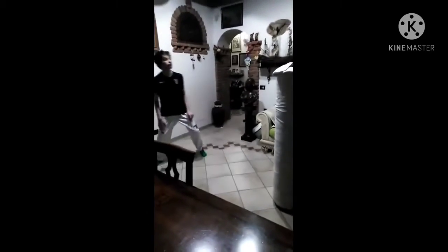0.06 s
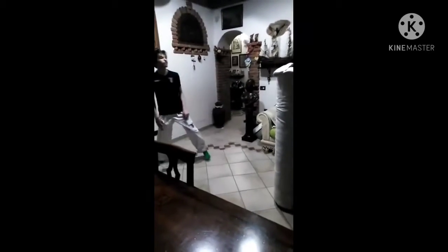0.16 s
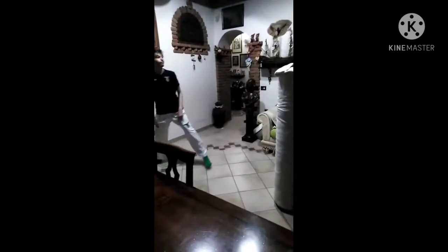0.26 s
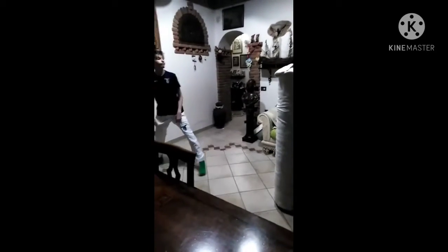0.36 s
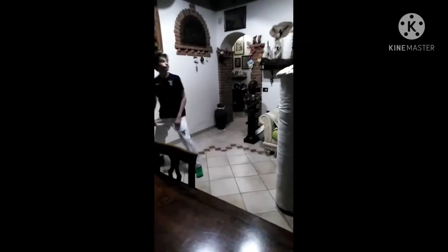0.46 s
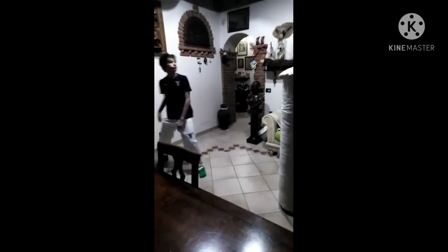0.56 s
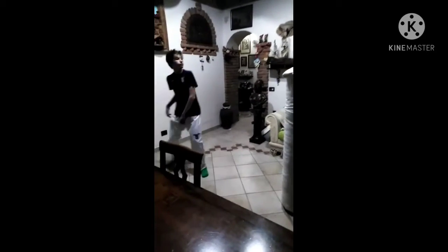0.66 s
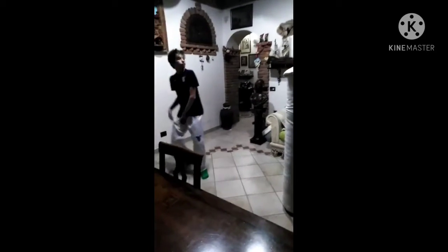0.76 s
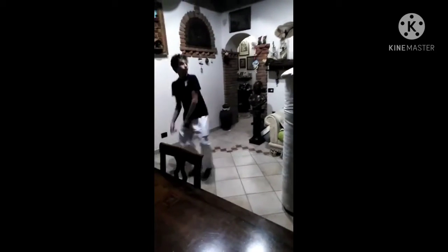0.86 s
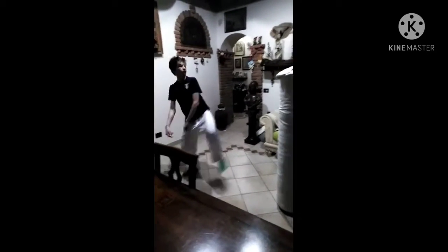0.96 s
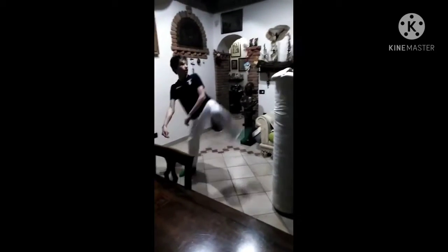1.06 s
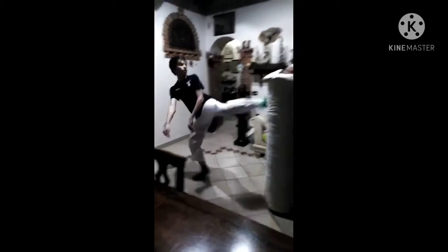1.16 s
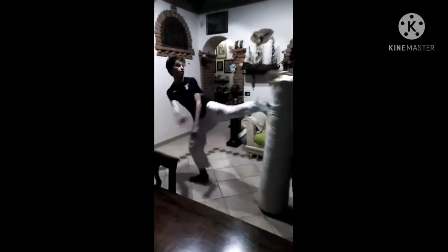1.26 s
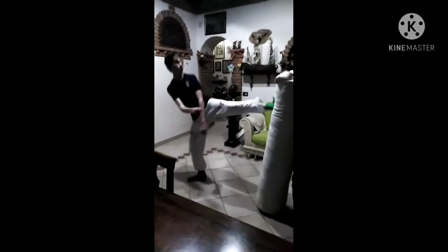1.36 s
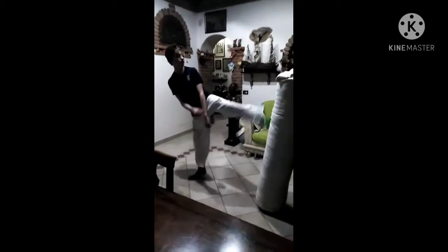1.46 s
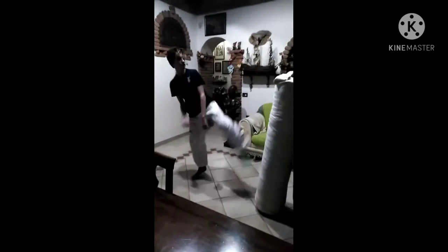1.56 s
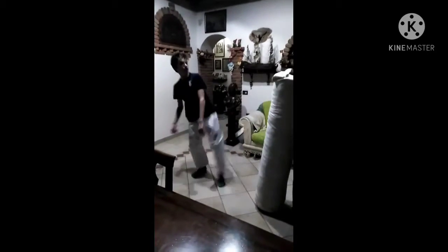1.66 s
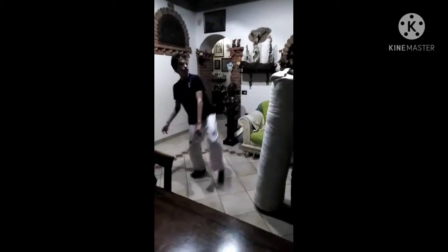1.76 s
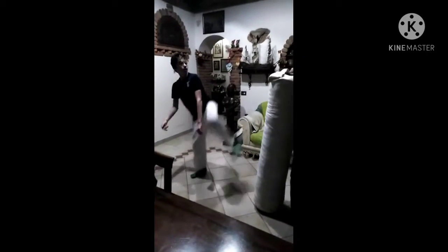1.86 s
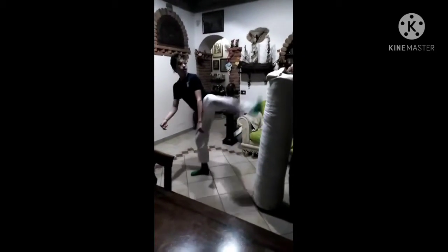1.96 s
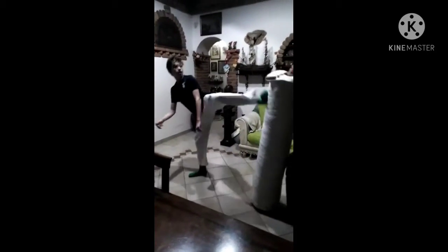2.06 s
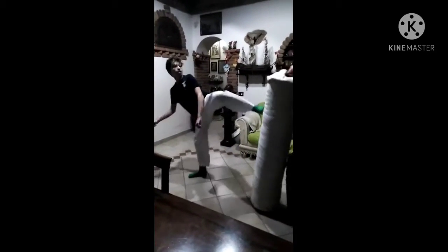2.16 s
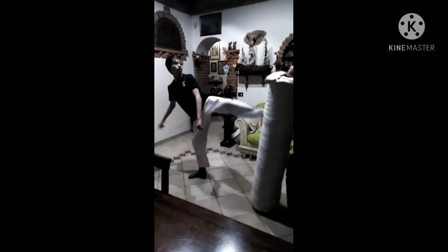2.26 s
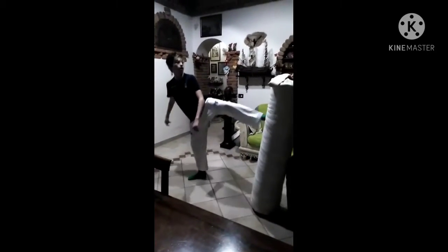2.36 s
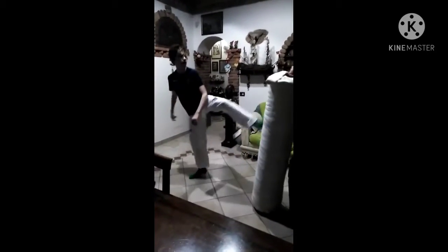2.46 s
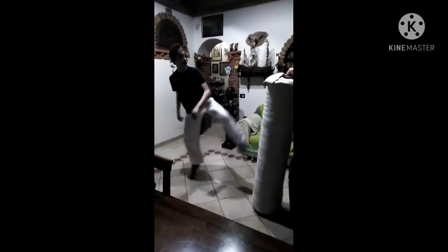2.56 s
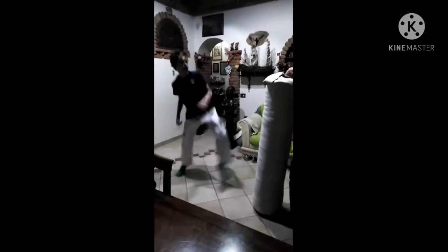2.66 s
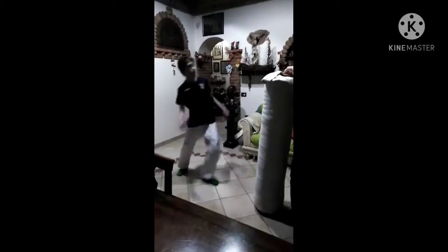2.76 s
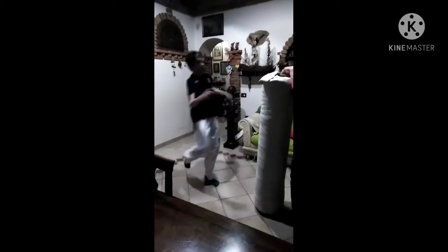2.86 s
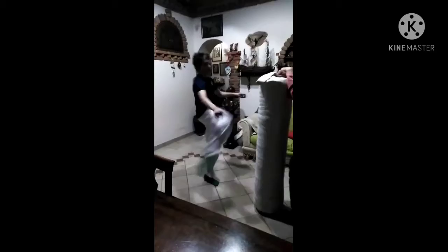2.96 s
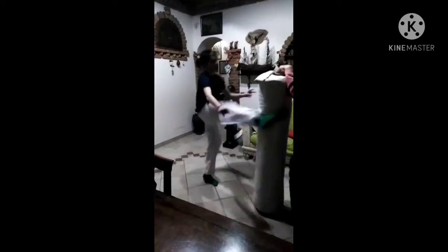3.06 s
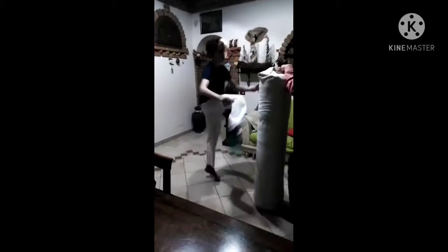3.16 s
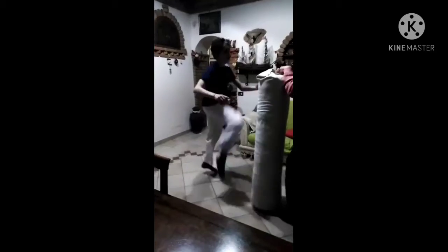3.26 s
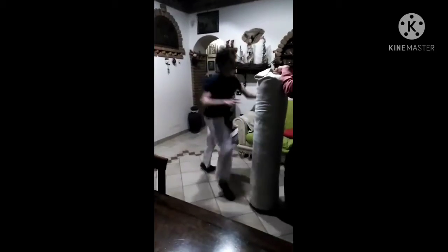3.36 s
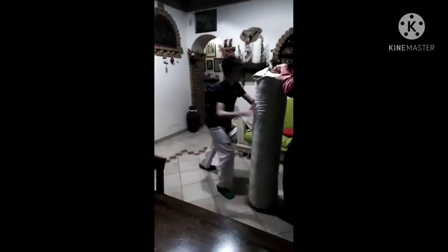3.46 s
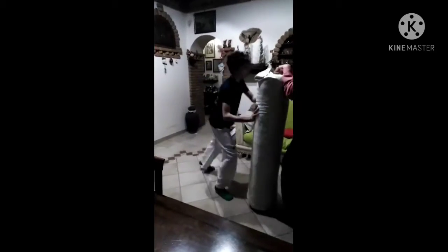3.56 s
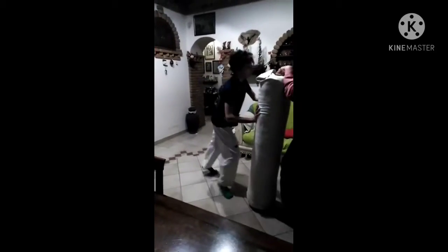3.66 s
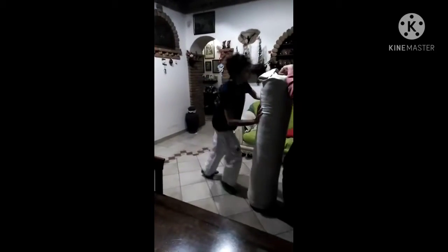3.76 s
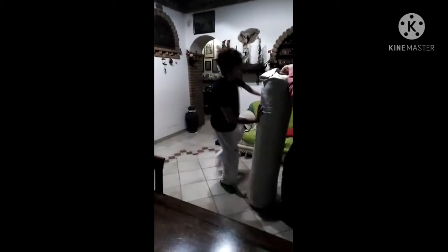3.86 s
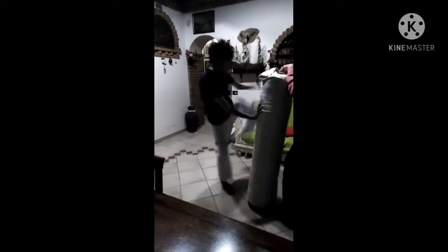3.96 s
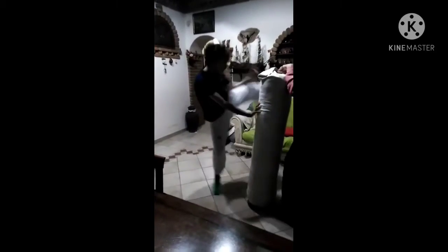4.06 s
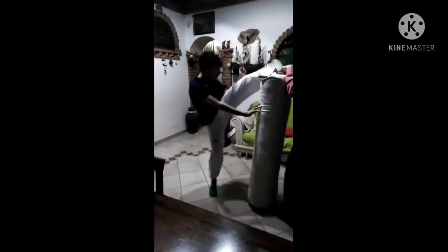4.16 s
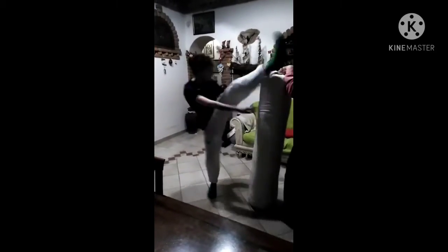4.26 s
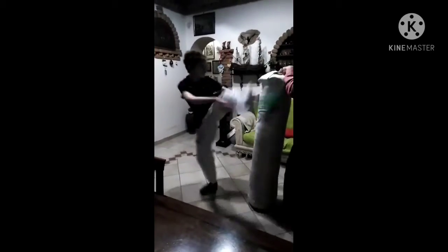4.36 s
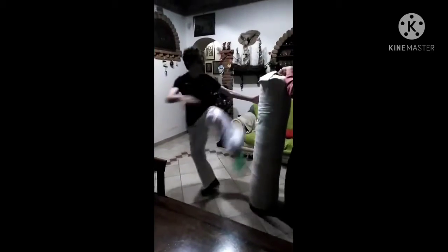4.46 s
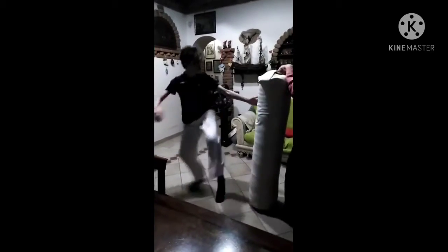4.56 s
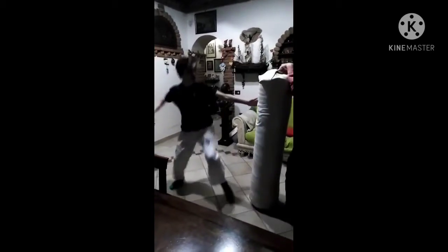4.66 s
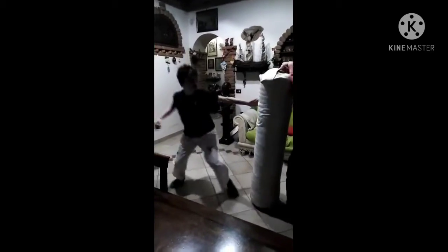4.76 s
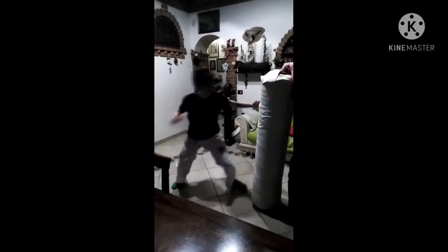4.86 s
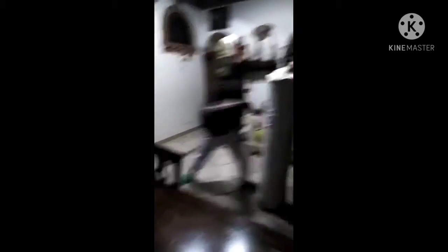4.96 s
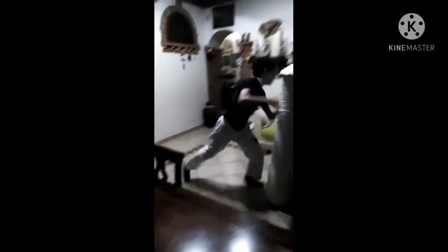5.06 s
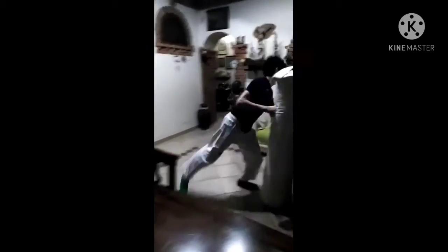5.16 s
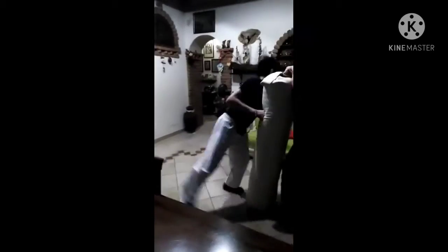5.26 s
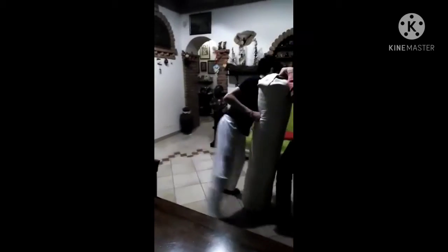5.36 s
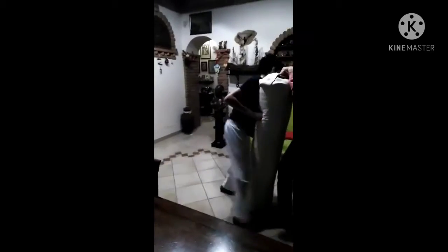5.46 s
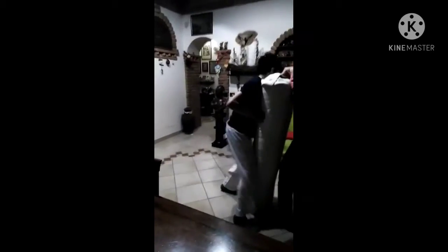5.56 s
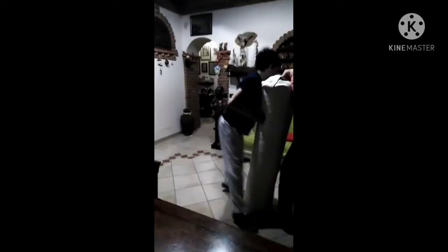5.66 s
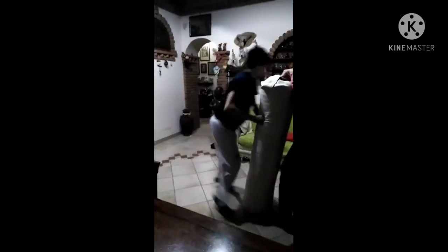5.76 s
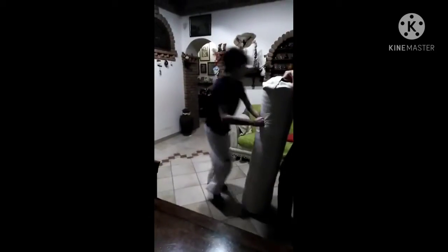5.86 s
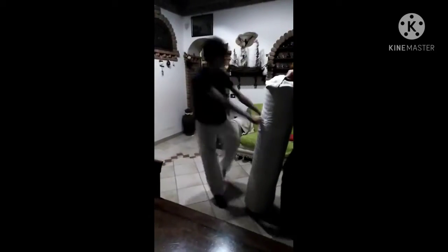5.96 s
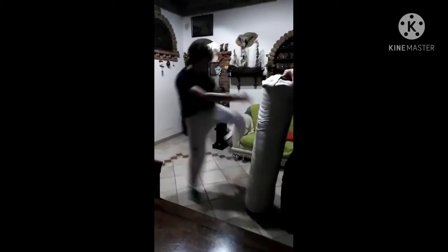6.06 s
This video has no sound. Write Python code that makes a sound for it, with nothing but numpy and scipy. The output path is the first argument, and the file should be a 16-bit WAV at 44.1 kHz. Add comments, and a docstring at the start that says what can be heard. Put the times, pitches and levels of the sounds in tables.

```python
"""A heavy standing bag is kicked and punched in a tiled living room, a few metres from a phone.
Each blow is a filtered thud, a decaying sine dent and two noise bursts: slapped cover, snapped trouser cloth.
Feet thump and slide on the tiles and clothes rustle: filtered pushes and grainy friction noise.
Echoes and banded noise tails make a room that rings for about half a second over a faint hush."""
import sys
import numpy as np
from scipy import signal
from scipy.fft import rfft, irfft, next_fast_len
from scipy.io import wavfile

SR = 44100
rng = np.random.default_rng(int(sys.argv[2]) if len(sys.argv) > 2 else 0)


def dump(signal):
    """Clip the signal to [-1, 1] and save it as 16-bit WAV at the path in sys.argv[1]."""
    limited = np.clip(np.atleast_2d(signal).T, -1, 1)
    pcm = np.round(limited * 32767).astype(np.int16)
    wavfile.write(sys.argv[1], SR, pcm)


N = 269446
RING_SAMPLES = 28000


def undb(db):
    """Decibels to gain."""
    return 10 ** (np.asarray(db) / 20)


def unit(x):
    """Scale to unit energy."""
    return x / np.sqrt(np.sum(x ** 2, axis=-1, keepdims=True) + 1e-30)


def on_log(hz, points_hz, values):
    """Join values by straight lines on a log-frequency axis."""
    return np.interp(np.log(np.maximum(hz, 1)), np.log(points_hz), values)


def response(spectrum):
    """Causal minimum-phase impulse response with the given (Hz, dB) colour, by folding the cepstrum."""
    size = 4096
    hz = np.linspace(0, SR / 2, size // 2 + 1)
    gain = undb(on_log(hz, *np.transpose(spectrum)))
    cepstrum = irfft(np.log(gain))
    cepstrum[1:size // 2] *= 2
    cepstrum[size // 2 + 1:] = 0
    return irfft(np.exp(rfft(cepstrum)))


def colour(x, spectrum):
    """Filter a signal by a spectrum."""
    return signal.fftconvolve(x, response(spectrum))[:len(x)]


def resonate(x, hz, width_hz):
    """One resonance."""
    return signal.lfilter(*signal.iirpeak(hz, hz / width_hz, fs=SR), x)


def grains(count, spread_db, grain_samples=24):
    """Friction noise: tiny slips of uneven strength, rms 1."""
    slip_db = spread_db * rng.standard_normal(count // grain_samples + 1)
    strength = np.repeat(undb(slip_db), grain_samples)[:count]
    return unit(rng.standard_normal(count) * strength) * np.sqrt(count)


def add(out, s, sound):
    """Mix a stereo sound in at time s."""
    start = max(int(s * SR), 0)
    out[:, start:start + sound.shape[1]] += sound[:, :N - start]


def burst(x, db):
    """Give a short sound the energy of 50 ms at this level."""
    return unit(x) * undb(db) * np.sqrt(SR / 20)


def push(spectrum, sharp_hz):
    """One push into a heavy body; a softer contact takes away the treble."""
    low_pass = signal.butter(2, sharp_hz, fs=SR, output="sos")
    return signal.sosfilt(low_pass, np.pad(response(spectrum), (0, SR // 4)))


# room bands: (centre [Hz], t60 [s], left-right likeness [0-1])
ROOM_BANDS = [(59.5, .52, 0.96), (149, 0.42, 0.96), (300, .53, 0.9), (597, 0.52, 0.4), (1200, 0.47, 0.01),
              (2500, 0.48, 0), (4980, 0.46, 0), (12000, .4, 0.07)]


def spread(mid, side):
    """Two unrelated signals become a diffuse field: alike in the bass, unrelated in the treble."""
    size = next_fast_len(len(mid), True)
    hz, _, likeness = np.transpose(ROOM_BANDS)
    c = on_log(np.fft.rfftfreq(size, 1 / SR), hz, likeness)
    m = rfft(mid, size) * np.sqrt((1 + c) / 2)
    s = rfft(side, size) * np.sqrt((1 - c) / 2)
    return irfft(np.array([m + s, m - s]), size)[:, :len(mid)]


def diffuse_field():
    """Two seconds of steady room noise, split into the room's bands: (band, channel, sample)."""
    size = 2 * SR
    noise = rfft(spread(*rng.standard_normal((2, size))))
    freqs_hz, centres_hz = np.fft.rfftfreq(size, 1 / SR), np.transpose(ROOM_BANDS)[0]
    return np.array([irfft(noise * on_log(freqs_hz, centres_hz, pick)) for pick in np.eye(len(ROOM_BANDS))])


FIELD = diffuse_field()


def tail(source_s=0.0082):
    """Diffuse reverberation of a source fading in source_s; random field slice, each band at its own t60."""
    t60_s = np.transpose(ROOM_BANDS)[1][:, None]
    decay = np.exp(-2 * np.log(1000) / t60_s * np.arange(RING_SAMPLES) / SR)
    power = signal.lfilter([1], [1, -np.exp(-2 / (source_s * SR))], decay)
    start = rng.integers(FIELD.shape[2] - RING_SAMPLES)
    envelope = unit(np.sqrt(power))
    return np.einsum("bcn,bn->cn", FIELD[:, :, start:start + RING_SAMPLES], envelope)


# early echoes off the tiles and walls: (delay [s], left gain [linear], right gain [linear])
ECHOES = [(.0022, 0.32, 0.22), (.0058, 0.1, 0.33), (.0085, .35, .3)]


def early():
    """The straight path, two samples later on the left, and the first echoes."""
    path = np.zeros((2, RING_SAMPLES))
    path[0, 2] = path[1, 0] = 1
    for delay_s, left, right in ECHOES:
        path[:, int(delay_s * SR)] += [left, right]
    return path


# standing waves of the room and the bag: (frequency [Hz], relative level [dB], t60 [s])
RINGING_MODES = [(97, -14, 0.19), (149.25, -6.5, 0.63), (340.3, -1, .45), (527, -8, 0.27),
                 (647.7, -6.5, 0.48), (661, -9, 0.59), (926, -5.5, 0.55), (1139, -4.5, 0.7),
                 (1323, -3, 0.28), (1505, -9.5, .28), (1606, -9, 1), (1680, -8, .3), (2230, -1.5, .35)]


def standing_waves(half_cycle_hz=1500):
    """Lightly damped modes left ringing; short waves reach the two microphones out of step."""
    t, out = np.arange(RING_SAMPLES) / SR, 0
    for hz, db, t60_s in RINGING_MODES:
        # channels differ by at most half a cycle at half_cycle_hz
        lead_rad = np.array([[1], [-1]]) * rng.uniform(-1, 1) * np.pi * hz / half_cycle_hz / 2
        mode = np.sin(2 * np.pi * hz * t + lead_rad) * np.exp(-np.log(1000) * t / t60_s)
        out = out + undb(db) * unit(mode)
    return out


def room(x, direct_db, ring=0):
    """A compact source heard directly and through the room."""
    return signal.fftconvolve(x[None], undb(direct_db) * early() + tail() + ring, axes=1)


def crackle(spectrum, db, decay_s, direct_db, ring=0):
    """Noisy burst from a broad surface: directions get different grains, so the reverberation is smooth."""
    t = np.arange(RING_SAMPLES) / SR
    slips = unit(grains(RING_SAMPLES, spread_db=7) * np.exp(-t / decay_s))
    direct = signal.fftconvolve(slips[None], early(), axes=1)[:, :RING_SAMPLES]
    heard = undb(direct_db) * direct + tail(decay_s) + ring
    return signal.fftconvolve(heard, burst(response(spectrum), db)[None], axes=1)


def friction(spectrum, grain_db):
    """Steady noise spread by the room, grainier as grain_db leaves 0; rms 1."""
    left_right = spread(*(colour(grains(N, grain_db), spectrum) for _ in range(2)))
    return unit(left_right) * np.sqrt(N)


# quiet-room spectrum: (frequency [Hz], relative density [dB])
HUSH = [(25, -20), (70, 0.5), (150, -6), (300, -8.5), (600, -21), (2000, -18), (14000, -28)]
HUSH_DB = -69.5


def hush():
    """Steady diffuse noise of a very quiet room."""
    return undb(HUSH_DB) * friction(HUSH, grain_db=3.5)


def strokes(rate_hz=45, depth_db=0.7):
    """Uneven gain of short rubbing strokes."""
    knots = rng.standard_normal(1024)
    return undb(depth_db * np.interp(np.arange(N) / SR * rate_hz, np.arange(len(knots)), knots))


def swell(s, length_s, attack_s, release_s):
    """Envelope of one move: smooth attack, hold, release."""
    age_s = np.arange(N) / SR - s
    rise = np.clip(age_s / attack_s, 0, 1)
    return rise * np.sqrt(rise) * np.exp(-np.maximum(age_s - length_s, 0) / release_s)


# steps, pivots, leg swings: (time [s], length [s], sole friction [dB], cloth rustle [dB])
MOVES = [(-.02, 0.018, -63, -60.5), (0.277, 0.11, -57.5, -67.5), (0.754, .06, -80, -71),
         (0.989, 0.16, -55, -65), (1.356, .2, -48, -52.5), (1.707, 0.047, -45.5, -66),
         (1.756, 0.066, -40, -73), (1.913, 0.2, -59, -68), (2.26, 0.066, -57, -66),
         (2.378, 0.081, -60, -68), (2.782, 0.12, -55, -88), (2.827, 0.099, -41.5, -63.5),
         (2.977, 0.34, -50.5, -74), (3.424, 0.1, -56, -64.5), (3.508, 0.057, -48, -64),
         (3.854, 0.061, -54, -80.5), (3.902, 0.36, -55, -55.5), (4.225, 0.11, -46, -57),
         (4.382, 0.057, -43, -59.5), (4.571, 0.086, -66, -63.5), (4.633, 0.074, -50.5, -49),
         (4.943, 0.13, -53.5, -55.5), (5.249, 0.13, -83, -65), (5.532, 0.025, -53.5, -61),
         (5.592, 0.053, -63.5, -62), (5.906, 0.099, -54, -76), (5.97, 0.11, -47, -55)]
# friction spectra of sole and cloth: (frequency [Hz], relative density [dB])
SOLE = [(30, -11.5), (70, 1.5), (160, 3.5), (330, 7), (550, 0.5), (1000, -0.5), (1900, -6.5), (3500, -15),
        (7000, -26), (15000, -45.5)]
CLOTH = [(100, -24.5), (700, -13), (2000, 4), (3500, 1), (5500, 1.5), (8000, -1.5), (12000, -4.5),
         (15000, -14)]
SOLE_ATTACK_S, SOLE_RELEASE_S = 0.03, 0.06
CLOTH_LAG_S, CLOTH_ATTACK_S, CLOTH_RELEASE_S = 0.0095, 0.019, 0.042


def movement():
    """Soles shuffle and clothes rustle as friction noise; the loose cloth trails the foot."""
    sole = cloth = 0
    for s, length_s, sole_db, cloth_db in MOVES:
        sole_swell = swell(s, length_s, SOLE_ATTACK_S, SOLE_RELEASE_S)
        cloth_swell = swell(s + CLOTH_LAG_S, length_s, CLOTH_ATTACK_S, CLOTH_RELEASE_S)
        sole = np.hypot(sole, undb(sole_db) * sole_swell)
        cloth = np.hypot(cloth, undb(cloth_db) * cloth_swell)
    shuffle = sole * strokes() * friction(SOLE, grain_db=2)
    rustle = cloth * strokes() * friction(CLOTH, grain_db=2.5)
    return shuffle + rustle


# weight shift onto a foot; level relative to the sole friction
SHIFT_DELAY_S, SHIFT_DB, SHIFT_HZ = 0.018, -3.5, 280
# light footwork before the first kick
PATTER_FROM_S, PATTER_UNTIL_S, PATTER_PER_S, PATTER_DB, PATTER_HZ = 0.27, 0.92, 8.7, -65, 221


def light_steps(scatter_db=2):
    """A soft tread under every move, and uneven patter on the way to the bag: (s, dB, sharpness Hz)."""
    steps = [(s + SHIFT_DELAY_S, sole_db + SHIFT_DB, SHIFT_HZ) for s, _, sole_db, _ in MOVES]
    for s in np.arange(PATTER_FROM_S, PATTER_UNTIL_S, 1 / PATTER_PER_S):
        late, weight = rng.uniform(-1, 1, 2)
        late_s = abs(late) / PATTER_PER_S / 2
        steps.append((s + late_s, PATTER_DB + scatter_db * weight, PATTER_HZ))
    return steps


# footfalls, faint to heavy: (time [s], level [dB], contact sharpness [Hz])
THUMPS = [(0.095, -66, 240), (.212, -61, 350), (0.255, -54, 201), (.344, -54, 300), (0.498, -53.5, 98),
          (.605, -49, 120), (.652, -56, 116), (1.518, -48, 404), (1.728, -44.5, 220), (2.025, -58, 700),
          (2.423, -60.5, 456), (2.745, -48.5, 147), (2.786, -48, 600), (2.803, -37, 180),
          (2.852, -34.5, 147), (2.891, -42.5, 170), (3.03, -51, 496.5), (3.369, -44, 310),
          (3.455, -42.5, 255.3), (3.888, -52.5, 405), (4.182, -47.5, 170), (4.246, -38, 156),
          (4.302, -47, 149), (4.399, -40.5, 384), (5.882, -51.5, 202), (5.916, -42.5, 175.3)]
# bag rocking back on its base after a blow: (time [s], level [dB], contact sharpness [Hz])
ROCKS = [(1.315, -37, 148), (1.343, -42, 138), (2.088, -37.5, 351), (3.135, -33.5, 614),
         (3.151, -35.5, 129.2), (5.0726, -31, 750)]
# floor spectrum: (frequency [Hz], relative density [dB])
FLOOR = [(25, -23.5), (55, -3.5), (95, 1), (160, -2), (260, -6.5), (500, -9), (1500, -8), (15000, -49)]


def thumps():
    """Dull pushes on the floor, from feet and the rocking base, heard mostly through the room."""
    out, ring = np.zeros((2, N)), undb(-26) * standing_waves()
    for s, db, sharp_hz in THUMPS + ROCKS + light_steps():
        add(out, s, room(burst(push(FLOOR, sharp_hz), db), direct_db=-11.5, ring=ring))
    return out


# trouser legs flicking taut: (time [s], level [dB], decay [s])
FLICKS = [(.214, -67, 0.0034), (1.005, -61.5, .006), (2.027, -82, .005), (3.031, -70, .004),
          (4.973, -58.5, .015), (5.0712, -38, 0.001), (5.413, -72, .003), (5.555, -65.5, .006),
          (5.97, -71.5, .008)]


def flicks():
    """Loose cloth pulled taut as a leg starts or stops: short noise bursts."""
    out = np.zeros((2, N))
    for s, db, decay_s in FLICKS:
        add(out, s, crackle(CLOTH, db, decay_s, direct_db=-5))
    return out


# sliding soles and trouser legs: (time [s], length [s], level [dB], pitch [Hz], width per resonance [Hz])
SKIDS = [(0.233, 0.13, -58, 5400, 3200), (0.667, 0.028, -74, 2560, 1800), (0.762, 0.065, -69, 2800, 2620),
         (4.627, 0.1, -50, 2460, 2600), (4.91, 0.12, -58.5, 1510, 220), (5.868, 0.25, -55, 1557, 170)]


def skids():
    """Sliding cloth hisses; a faint rub or scuff sits in a narrow band: grains through two equal resonances."""
    out = np.zeros((2, N))
    for s, length_s, db, hz, width_hz in SKIDS:
        count = int(length_s * SR)
        slip = grains(count, spread_db=3.5) * signal.windows.tukey(count, 0.55)
        rub = resonate(resonate(slip, hz, width_hz), hz, width_hz)
        add(out, s, room(burst(rub, db), direct_db=-0.5))
    return out


# blows on the bag: (time [s], thud [dB], contact sharpness [Hz], dent [dB], dent pitch [Hz],
#   slap [dB], slap decay [s], cloth [dB], cloth delay [s], cloth decay [s])
BLOWS = [(1.214, -38, 800, -38.5, 358, -42, 0.062, -38.5, 0.0081, 0.066),
         (2.055, -38, 511, -35.5, 240, -39.5, 0.057, -42, .008, 0.072),
         (3.116, -22.5, 1400, -30.5, 321.7, -27.5, 0.004, -33, .0055, 0.0096),
         (5.0555, -22.5, 640, -31.5, 550, -31, 0.0015, -32.5, .002, .006)]
# spectra of filling, slapped cover, snapping cloth: (frequency [Hz], relative density [dB])
BAG = [(25, -36.5), (50, -10), (85, 0.5), (150, 3), (250, -1.5), (400, -8), (600, -7), (1000, -9.5),
       (3000, -18.5), (15000, -37.5)]
COVER = [(100, -18.5), (600, -5.5), (1000, -4.5), (1300, -6), (1600, -7), (1900, -3), (2400, -9),
         (3500, -13), (6000, -19), (15000, -25.5)]
SNAP = [(100, -15.5), (700, 5), (2000, -0.5), (4000, -2.5), (6500, -5.5), (10000, -5.5), (15000, -11)]
CONTACT_DB = -3.5  # direct sound of cover and cloth, relative to their reverberation


def blows(dent_cycles=1.3):
    """The filling thuds, the dent springs back, the cover slaps, then the cloth snaps and crumples."""
    out, ring, t = np.zeros((2, N)), standing_waves(), np.arange(SR // 20) / SR
    for (s, thud_db, sharp_hz, dent_db, dent_hz,
         slap_db, slap_s, cloth_db, cloth_delay_s, cloth_s) in BLOWS:
        thud = burst(push(BAG, sharp_hz), thud_db)
        add(out, s, room(thud, direct_db=-14.5, ring=undb(-24.5) * ring))
        dent = np.sin(2 * np.pi * dent_hz * t) * np.exp(-t * dent_hz / dent_cycles)
        add(out, s, room(burst(dent, dent_db), direct_db=-12.0))
        add(out, s, crackle(COVER, slap_db, slap_s, direct_db=CONTACT_DB, ring=undb(-21.5) * ring))
        add(out, s + cloth_delay_s, crackle(SNAP, cloth_db, cloth_s, direct_db=CONTACT_DB))
    return out


# where the kicker stands: (time [s], left minus right [dB])
PLACE = [(0, 1), (.8, 3), (1.099, 0), (3, .5), (6.1, -0.5)]


def scene():
    """Blows, footwork that follows the kicker, and a very quiet room."""
    pan_db = np.interp(np.arange(N) / SR, *np.transpose(PLACE))
    footwork = movement() + thumps() + flicks() + skids()
    return hush() + footwork * undb(np.array([pan_db, -pan_db]) / 2) + blows()


# noise suppressor threshold: (frequency [Hz], level per bin [dB])
SUPPRESS = [(60, -71), (200, -79), (600, -78), (2000, -80), (6000, -87), (14000, -96)]


def suppress(x, memory=0.66, depth_db=-16):
    """Noise suppressor: each narrow band is turned down while its recent power is low."""
    size = 512
    hz, _, bins = signal.stft(x, SR, nperseg=size)
    power = signal.lfilter([1 - memory], [1, -memory], np.abs(bins) ** 2)
    threshold = undb(on_log(hz, *np.transpose(SUPPRESS)))[:, None]
    excess = (power / threshold ** 2) ** 2
    gain = (excess + undb(depth_db)) / (excess + 1)
    return signal.istft(bins * gain, SR, nperseg=size)[1][:, :N]


TOP_HZ = 14250


def record(dry, balance_db=-0.1, bass_cut_hz=45):
    """The phone hears very slightly more on the right, loses deep bass, suppresses faint noise, cuts the top."""
    tilted = dry * undb(np.array([[balance_db], [-balance_db]]) / 2)
    thin = signal.sosfilt(signal.butter(2, bass_cut_hz, "high", fs=SR, output="sos"), tilted)
    top_cut = signal.ellip(12, 0.2, 80, TOP_HZ, fs=SR, output="sos")
    return signal.sosfilt(top_cut, suppress(thin))


dry = scene()
out = record(dry)
dump(out)
```